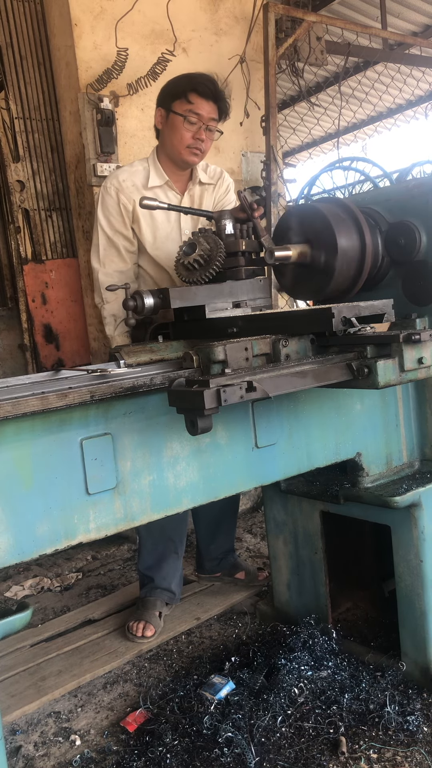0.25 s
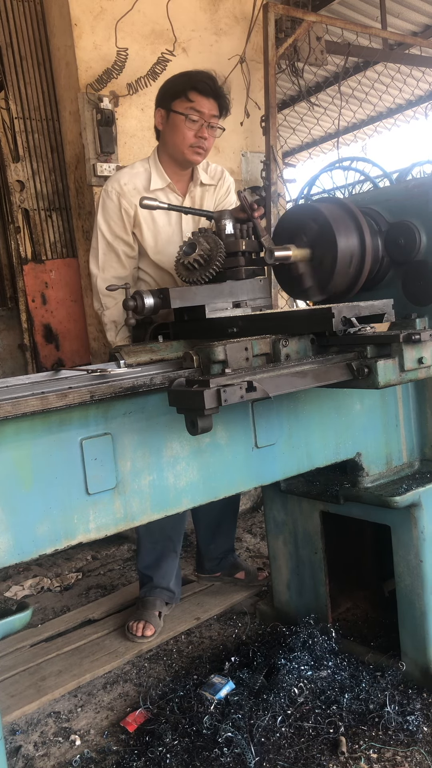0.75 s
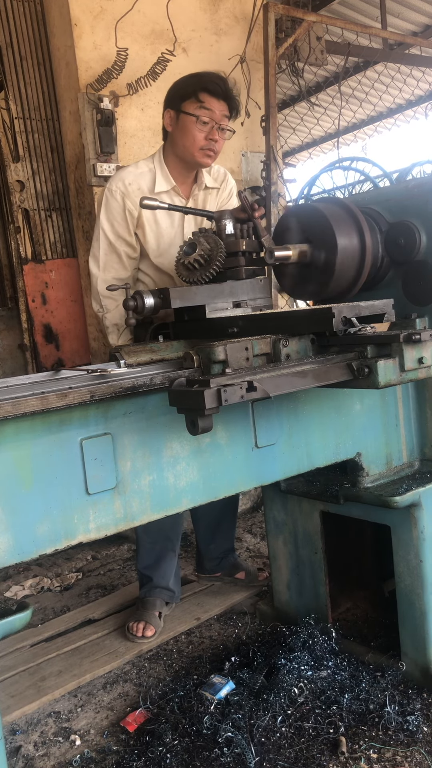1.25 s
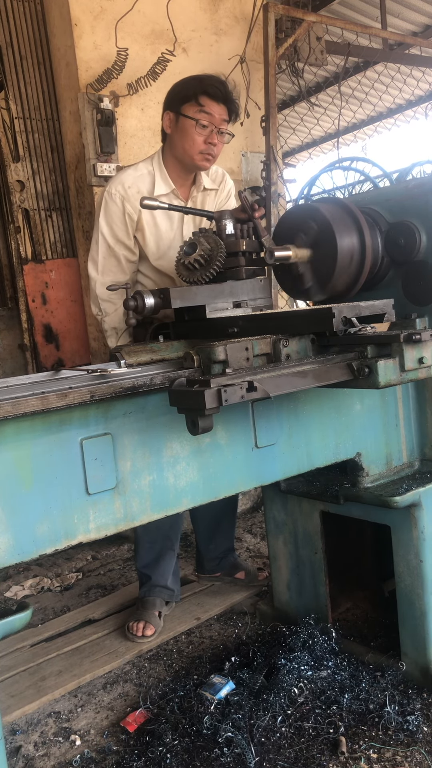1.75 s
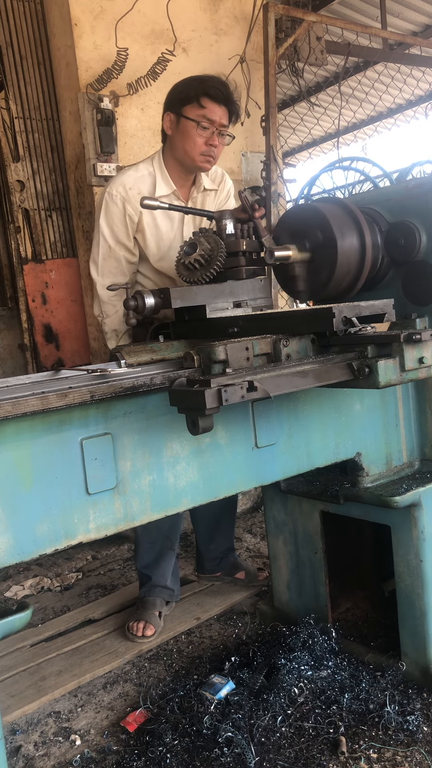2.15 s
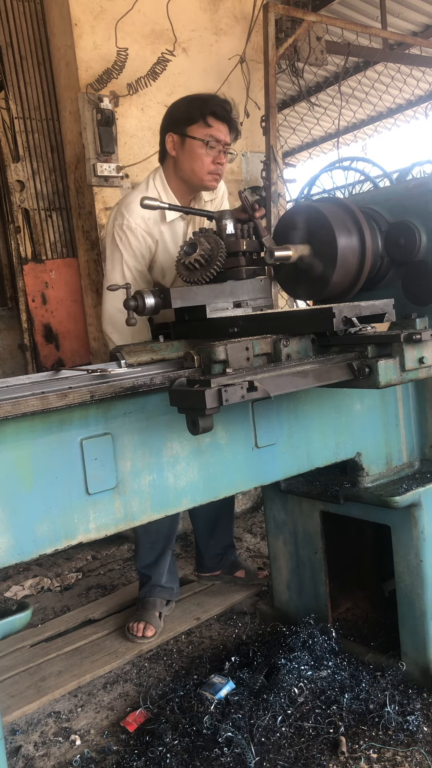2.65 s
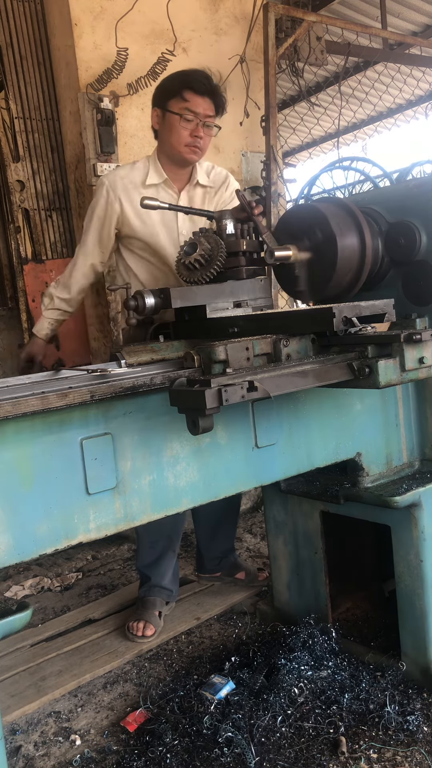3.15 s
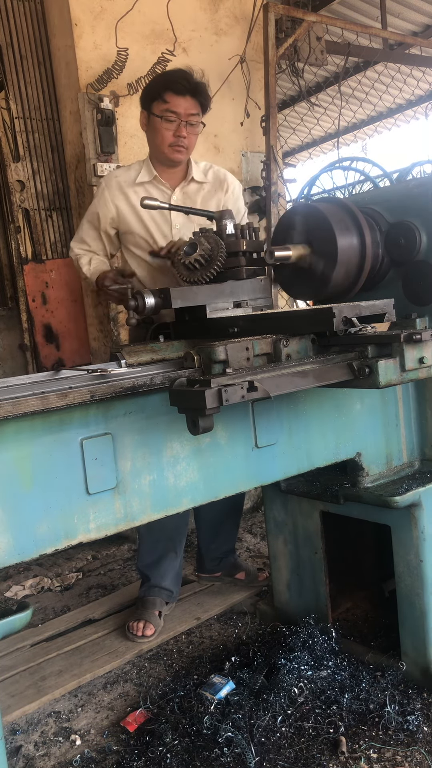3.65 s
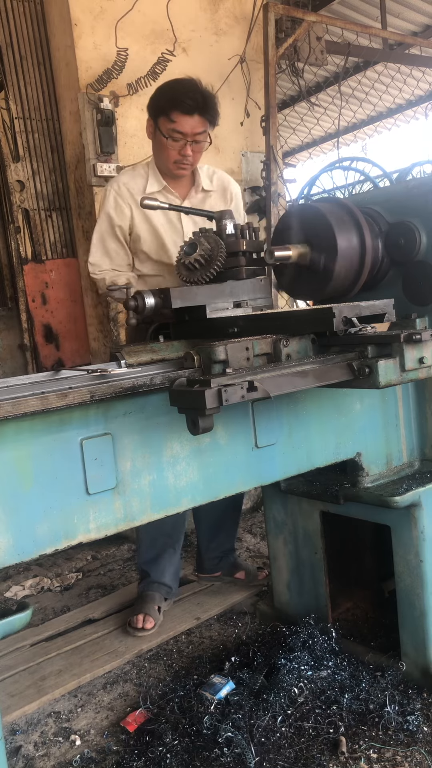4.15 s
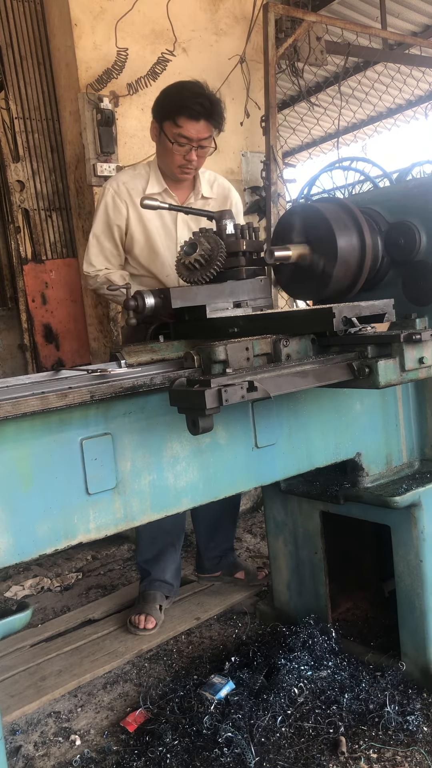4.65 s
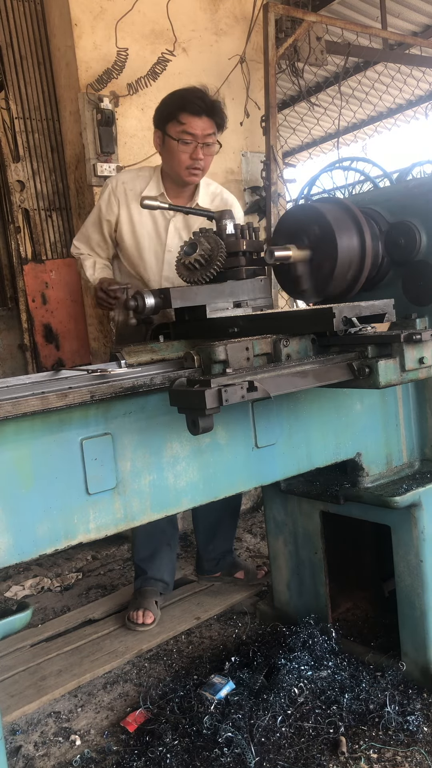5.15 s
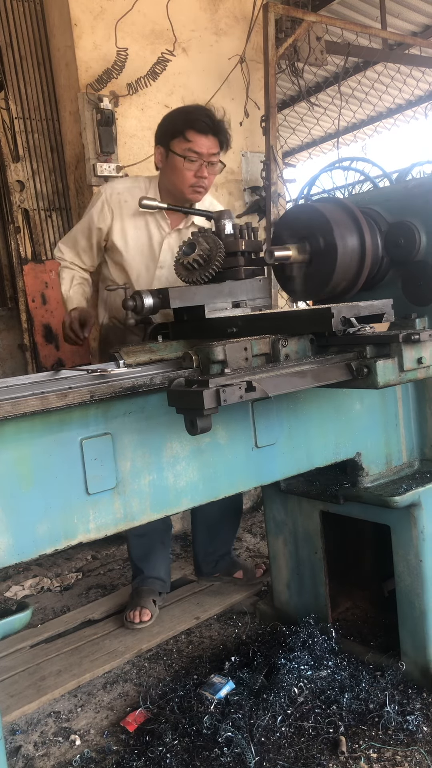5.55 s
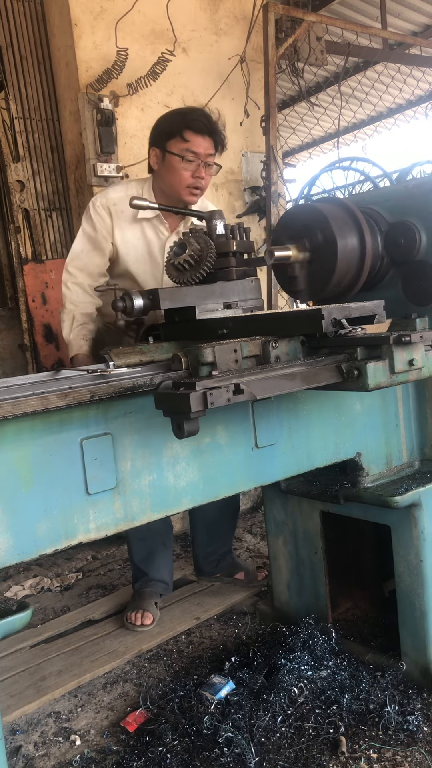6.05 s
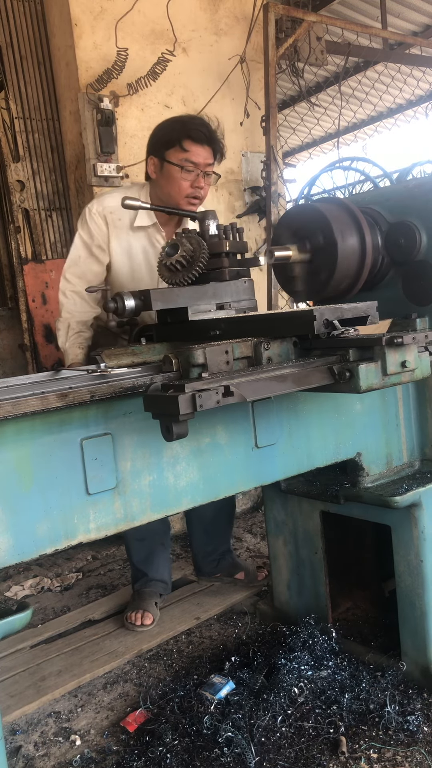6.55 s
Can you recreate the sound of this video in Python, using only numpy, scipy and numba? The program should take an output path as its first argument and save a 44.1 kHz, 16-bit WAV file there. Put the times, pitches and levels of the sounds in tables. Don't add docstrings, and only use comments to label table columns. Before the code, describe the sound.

A metal lathe runs throughout in an open tin-roofed shed, heard in mono from about two metres by a phone. Bearings and gears make a steady, rough low-mid roar with narrow whines and a wavering belt boom. From 0 to 2.4 s the cutting tool adds a bright, sizzling hiss with ringing high metal tones and a faint throbbing bar. At about 2.45 to 2.63 s the cut surges and its note sweeps rapidly upward, then vanishes. From 2.7 s short scraping squeaks around 4.3 kHz come every 0.18 s, faint at first, swelling strongly from 3.9 s into piercing, slightly sagging squeals until about 5.4 s, with light shed reflections. Irregular tiny washer clinks and duller gear clacks start around 2.8 s and continue over the bare machine rumble until the end at 6.8 s.

```python
import sys
import numpy as np
from scipy import signal
from scipy.fft import rfft, irfft, next_fast_len
from scipy.io import wavfile
from scipy.ndimage import uniform_filter1d
from numba import njit

SR = 44100
rng = np.random.default_rng(int(sys.argv[2]) if len(sys.argv) > 2 else 0)


def gain_from_db(level_db):
    decades = np.asarray(level_db, float) / 20
    return 10 ** decades


def file_out(sig):
    cols = np.atleast_2d(sig).T
    lim = np.clip(cols, -1, 1)
    pcm = np.round(lim * 32767).astype(np.int16)
    wavfile.write(sys.argv[1], SR, pcm)


N = 299439


def curve(table):
    s, *columns = np.transpose(table)
    return [np.interp(np.arange(N) / SR, s, c) for c in columns]


def unit(x):
    return x / np.sqrt(np.mean(x ** 2))


def colour(x, points):
    hz, db = np.transpose(points)
    size = next_fast_len(N)
    log_hz = np.log(np.arange(size // 2 + 1) * SR / size + 1)
    gain = gain_from_db(np.interp(log_hz, np.log(hz), db))
    return unit(irfft(rfft(x, size) * gain, size)[:N])


@njit
def svf(x, hz, width):
    y, band, low = np.empty(len(x)), 0., 0.
    for i in range(len(x)):
        g, k = np.tan(np.pi * hz[i] / SR), width / hz[i]
        v = (band + g * (x[i] - low)) / (1 + g * (g + k))
        band, low, y[i] = 2 * v - band, low + 2 * g * v, k * v
    return y


def ring(force, hz, width):
    centre = hz * np.ones(N)
    return svf(svf(force, centre, width), centre, width)


def walk(rate):
    k = int(SR / rate)
    held = np.repeat(rng.standard_normal(N // k + 1), k)
    return unit(uniform_filter1d(uniform_filter1d(held, k), k)[:N])


def modes(table, flicker_db, rate, sharp=1.41, push=1):
    out = 0
    for hz, width, db in table:
        force = rng.standard_normal(N) * gain_from_db(flicker_db * walk(rate))
        even = np.sqrt(SR / width / sharp) / np.sqrt(np.pi / 2)
        out = out + gain_from_db(db) * even * ring(force * push, hz, sharp * width)
    return out


def wobbling_sine(hz):
    return np.sin(2 * np.pi * np.cumsum(hz) / SR)


def headstock():
    # pitch_hz, level_db (per Hz)
    roar_shape = [(15, -51), (25, -53), (38, -2.5), (113, 1), (188, -2), (246, -1.5), (457, -6),
                  (567, -5.5), (684, -4), (1270, -4), (1900, -7.5), (3720, -16.5), (4380, -20),
                  (5580, -20.5), (15500, -44)]
    # pitch_hz, width_hz, level_db
    panels = [(128.3, 8.3, -1.5), (182.5, 31, -7), (104.6, 13, -11)]
    # pitch_hz, width_hz, level_db (rms)
    mesh_lines = [(375.4, 31.5, -43), (567.5, 43, -45.5), (594, 7.6, -46), (642.7, 14, -44.5),
                  (736.5, 16, -43.5), (796, 3.7, -46), (934, 6.6, -50), (1256, 14.5, -42.5),
                  (1405, 3.1, -65), (1500, 20, -44.5), (1754, 90, -41), (1898, 55, -41.5), (9808, 9, -69)]
    # pitch_hz, level_db (rms)
    gear_tones = [(559.8, -42), (882.8, -45.5)]
    # start_s, boom_db
    belt_shake = [(0, -38), (.8, -28.5), (1.4, -34.5), (2.0, -29.5), (2.35, -34), (2.65, -26.5), (3.0, -41),
                  (3.3, -28), (3.75, -28), (4.1, -34), (4.9, -39), (5.5, -32.5), (6.2, -44), (6.79, -40)]
    panel_hz, panel_width_hz = 152.9, 8.2

    load_db = 0.5 * np.clip((2.7 - np.arange(N) / SR) / 0.16, 0, 1)
    rattle = rng.standard_normal(N) * gain_from_db(1.09 * walk(90))
    roar = gain_from_db(-28 + load_db + 0.52 * walk(5)) * colour(rattle, roar_shape)

    boom = gain_from_db(-37.5) * unit(modes(panels, flicker_db=0.5, rate=2.45))
    shaken = wobbling_sine(panel_hz + 2.494 * walk(6))
    loose = modes([(panel_hz, panel_width_hz, 0)], flicker_db=0.5, rate=3.8)
    shaken = shaken + 0.41 * unit(loose)
    shake_db, = curve(belt_shake)
    boom = boom + gain_from_db(shake_db - 3.0 + 0.6 * walk(4.6)) * shaken

    hum = 0
    for hz, db in gear_tones:
        hum = hum + gain_from_db(db + 3.5 + 0.15 * walk(4.0)) * wobbling_sine(hz + 0.577 * walk(2.93))
    return roar + boom + hum + gain_from_db(-1.0) * modes(mesh_lines, flicker_db=1.74, rate=3.0)


def cut():
    # start_s, hiss_db
    depth = [
        (0, -43),
        (1.2, -43),
        (2.35, -43),
        (2.47, -40.5),
        (2.595, -40.5),
        (2.635, -51),
        (2.7, -56),
    ]
    # pitch_hz, level_db (per Hz)
    chip_shape = [(1290, -58), (2200, -20), (3420, -5), (4900, -5), (5670, 3), (6360, -6), (7020, 3.5),
                  (7490, -8.5), (12000, -27.5), (15500, -36)]
    # pitch_hz, width_hz, level_db (over the chip hiss)
    holder = [(4510, 210, -4), (5070, 10, -16), (5250, 59, -2), (5360, 53, -6), (5500, 38, -10),
              (8760, 610, -7.5), (9780, 140, -10), (9840, 12, -23), (10080, 78, -13.5), (11420, 90, -26),
              (11820, 380, -15.5), (12950, 300, -21), (14400, 450, -18), (14520, 90, -27)]
    # pitch_hz, width_hz, level_db (over the chip hiss)
    curl_modes = [(3135, 84, -3.5), (3227, 71, -8.5), (3417, 49, -2.5), (3470, 42, 1.5), (3770, 16, -10)]
    # pitch_hz, width_hz, level_db
    tip_low = [(5705, 48, -8.5), (5812, 26, -2.5), (11800, 70, -31), (11450, 170, -20)]
    # pitch_hz, width_hz, level_db
    tip_high = [(6937, 93, 8), (7080, 230, -7)]
    # pitch_hz, width_hz, level_db
    bar = [(1484.4, 17, -7), (2103, 31, -12)]
    bar_leads = (0.0079, 0.082)
    bar_free = (2.4, 2.56)
    # start_s, pitch_hz, level_db
    exit_song = [
        (2.3, 3100, -53),
        (2.44, 3140, -43),
        (2.5, 3450, -33),
        (2.535, 3730, -35),
        (2.56, 4540, -36),
        (2.585, 5350, -28),
        (2.61, 6400, -34),
        (2.635, 7550, -69),
    ]

    t = np.arange(N) / SR
    fade = np.clip((2.72 - t) / 0.051, 0, 1)
    hiss_db, = curve(depth)
    hiss = gain_from_db(hiss_db) * fade
    tip = gain_from_db(2.2 * (hiss_db + 42.5)) * fade

    tear = rng.standard_normal(N) * gain_from_db(0.67 * walk(150) + 1.5 * walk(24.3))
    out = hiss * (gain_from_db(9.5) * colour(tear, chip_shape) + gain_from_db(3) * modes(holder, flicker_db=2.0, rate=30))
    low_ring = unit(modes(tip_low, flicker_db=1.0, rate=110, sharp=3.0))
    out = out + tip * gain_from_db(-32.5) * low_ring
    high_ring = unit(modes(tip_high, flicker_db=4.7, rate=70, sharp=1.5))
    out = out + tip * gain_from_db(-35 + 0.6 * walk(7.5)) * high_ring

    turn_s = .1768
    for mode, lead_s, free_s in zip(bar, bar_leads, bar_free):
        throb = gain_from_db(-32 + 4 * np.cos(4 * np.pi * (t - lead_s) / turn_s))
        held = np.clip((free_s - t) / 0.069, 0, 1)
        out = out + throb * held * modes([mode], flicker_db=-0.5, rate=7.25, sharp=1.04)

    exit_hz, exit_db = curve(exit_song)
    curl = gain_from_db(2.5 - 2.5 * np.abs(t - 0.78)) * np.clip((3900 - exit_hz) / 350, 0, 1)
    out = out + hiss * curl * modes(curl_modes, flicker_db=1.5, rate=58)
    song = ring(tear, exit_hz, 630.0) + 0.2 * ring(tear, 1.28 * exit_hz, 1100.0)
    return out + gain_from_db(exit_db) * fade * (exit_db > -59.) * unit(song)


def squeal():
    # deepest_s, bite_db, release_db
    rubs = np.array([(2.715, -30, -40), (2.896, -29, -42), (3.075, -26, -43), (3.250, -25, -35),
                     (3.429, -25, -42), (3.605, -26, -40), (3.781, -24.5, -34.5), (3.956, -19.5, -33),
                     (4.137, -18, -27), (4.312, -17.5, -26), (4.490, -16.5, -22.5), (4.663, -20, -25),
                     (4.84, -17, -22), (5.015, -18, -19.5), (5.193, -16, -19.5), (5.366, -16.5, -20.5)])
    # from_deepest_s, pitch_hz
    sag = [
        (-.046, 4320),
        (-.016, 4230),
        (-.011, 4105),
        (.014, 4275),
        (.022, 4240),
        (.045, 4300),
        (.075, 4420),
    ]
    # multiple, level_db
    overtones = [(2, -28), (3, -53)]
    # pitch_hz, width_hz, level_db
    shank = [(4288, 124, 8), (4275, 210, 1), (4470, 60, -9.5), (8390, 390, -21), (11780, 200, -26)]

    t = np.arange(N) / SR
    nearest = np.argmin(np.abs(t[::64, None] - rubs[:, 0] - .03), axis=1)
    turn = nearest.repeat(64)[:N]
    deepest_s, bite_db, free_db = rubs[turn].T
    since = t - deepest_s

    touch = gain_from_db(1.14 * bite_db - 6.0) * np.clip((since + 0.044) / 0.015, 0, 1)
    touch = touch * np.clip((-.011 - since) / 0.0018, .4, 1) * (since < 0)
    bite = gain_from_db(bite_db) * np.exp(-.5 * (since / np.where(since < -.002, .0035, .011)) ** 2)
    late_s = np.where(deepest_s < 4.58, .022, .034)
    spread_s = np.clip(0.67 * late_s, .01, .03)
    free = gain_from_db(free_db) * np.exp(-.5 * np.abs((since - late_s) / spread_s) ** 2.3)
    grip = uniform_filter1d(np.maximum(np.maximum(touch, bite), free), size=60)

    light = np.clip((3.3 - t) / 0.54, 0, 1)
    hz = np.interp(since, *np.transpose(sag)) + (13 + 60 * light) * walk(90)
    hz = hz - 230 * light * np.exp(-.5 * ((since + 0.013) / .012) ** 2)
    phase = 2 * np.pi * np.cumsum(hz) / SR
    tone = np.sin(phase)
    for k, db in overtones:
        level = gain_from_db(db + 18.5 + 2.25 * walk(60)) * grip
        tone = tone + level * np.sin(k * phase + 0.49 * k * walk(220))
    chatter = gain_from_db(1.0 * walk(180))

    scrape = gain_from_db(-21.5) * modes(shank, flicker_db=-0.5, rate=170, push=np.abs(grip) ** 0.63)
    clamp = gain_from_db(-32.0) * modes([(4540, 26, 0.0008)], flicker_db=-2.0, rate=31, push=free ** 0.31)
    return (1.37 - 0.73 * light) * grip * chatter * tone + scrape + clamp


def ticks():
    # start_s, peak_db, pitch_hz
    clinks = [(2.812, -28.5, 5500), (3.1873, -36, 5600), (3.687, -36, 5410), (3.7983, -30, 5430),
              (3.8912, -39, 5410), (4.03, -30, 5680), (4.2666, -33, 5660), (4.2953, -30, 5390),
              (4.4354, -37, 5490), (4.594, -32, 5500), (4.9242, -36.5, 5368), (5.5749, -31.5, 5500),
              (5.621, -35, 5550), (5.8556, -34, 5400), (5.9479, -35, 5660), (5.9953, -34, 5500),
              (6.1818, -32.5, 5660), (6.322, -46, 5400), (6.462, -31.5, 5600), (6.7426, -42, 5660)]
    # start_s, peak_db
    clacks = [(2.9831, -39), (3.1233, -41), (5.137, -37), (5.4182, -34), (5.6984, -35.5), (6.1195, -37),
              (6.5395, -39)]
    partials = [(1, 1.0), (.89, .3), (1.021, .6), (.972, .65), (1.046, .6), (1.2, .15)]

    out, t = np.zeros(N + SR), np.arange(SR // 4) / SR
    crack_shape = [(1500, -30), (2800, 8), (6500, 1), (10000, -13), (15000, -25)]  # (Hz, dB)
    cracks = colour(rng.standard_normal(N), crack_shape)
    # start_s, peak_db, pitch_hz, t60_s, crack_db
    knocks = [(*row, .11, -3) for row in clinks]
    knocks += [(*row, 7000, 0.065, 11) for row in clacks]
    for s, db, hz, t60, crack_db in knocks:
        i = int(s * SR)
        decay = np.exp(-np.log(1000) * t / max(t60, .01))
        chime = decay * sum(np.sin(2 * np.pi * k * hz * t) * share for k, share in partials)
        crack = cracks[i // 2:i // 2 + len(t)] * np.exp(-t / 0.0086)
        out[i:i + len(t)] += gain_from_db(db - 8.0) * (chime + gain_from_db(crack_db) * crack)
    return out[:N]


def shed(x):
    t = np.arange(SR) / SR
    lowpass = signal.butter(2, 5200, fs=SR, output="sos")
    dull = signal.sosfilt(lowpass, rng.standard_normal(SR)) * np.exp(-np.log(1000) * t / .5)
    bright = .5 * rng.standard_normal(SR) * np.exp(-np.log(1000) * t / 0.2)
    tail = (dull + bright) * np.clip(t / .02, 0, 1)
    tail = tail / np.sqrt(np.sum(tail ** 2))
    return x + gain_from_db(-15) * signal.fftconvolve(x, tail)[:N]


def scene():
    mono = headstock() + shed(cut() + squeal() + ticks())
    return np.array([mono, mono])


def thin_above_squeal(x):
    def band(lo, hi):
        return signal.sosfiltfilt(signal.butter(6, (lo, hi), "band", fs=SR, output="sos"), x)

    squeal_power = uniform_filter1d(band(4000, 4600) ** 2, size=1500, origin=500)
    loud_db = 10 * np.log10(squeal_power + 1e-9)
    lost = 0
    for lo, hi, over_db in ((4680, 5150, -22.8), (5150, 5650, -19.6), (5650, 6250, -19.8)):
        lost = lost + np.clip(loud_db - over_db + .9 * walk(25), 0, 1) * band(lo, hi)
    return x - lost


def top_cut(x):
    return signal.sosfilt(signal.butter(12, 15710, fs=SR, output="sos"), x)


def record(dry):
    dry = signal.sosfilt(signal.butter(3, 47, "high", fs=SR, output="sos"), dry)
    rounded = np.tanh(1.115 * dry) / 1.086
    return top_cut(thin_above_squeal(rounded))


dry = scene()
out = record(dry)
file_out(out)
```